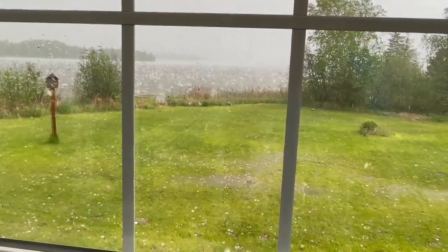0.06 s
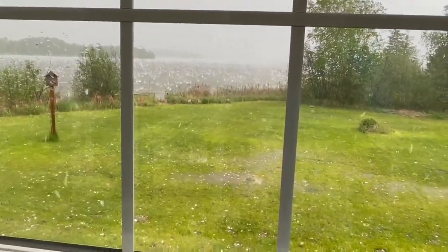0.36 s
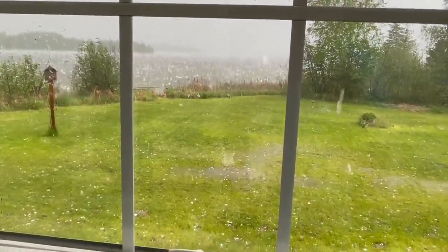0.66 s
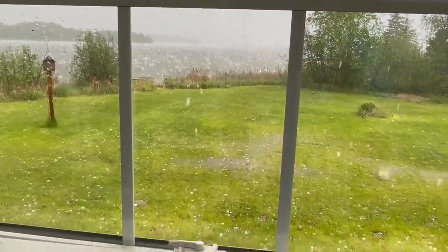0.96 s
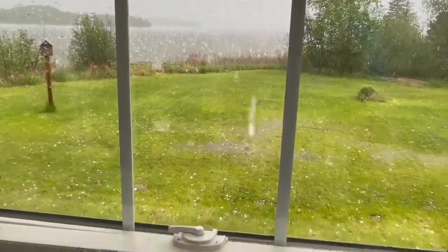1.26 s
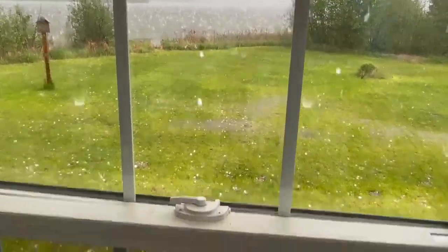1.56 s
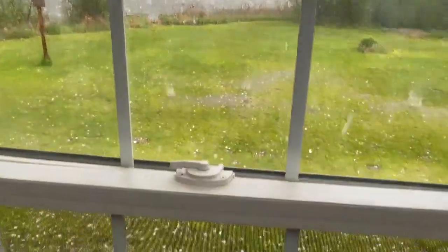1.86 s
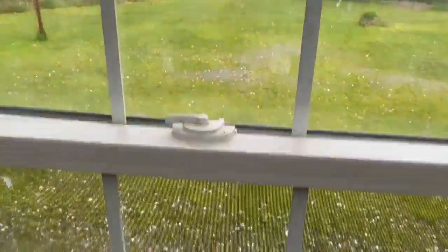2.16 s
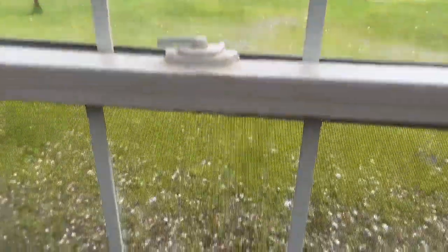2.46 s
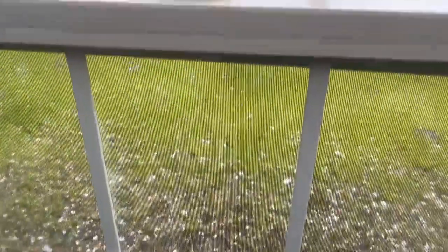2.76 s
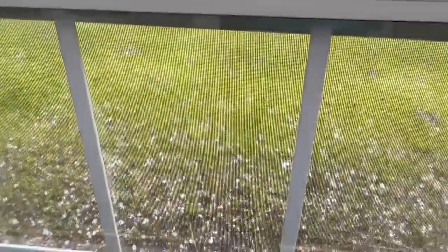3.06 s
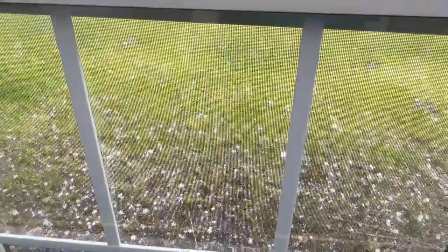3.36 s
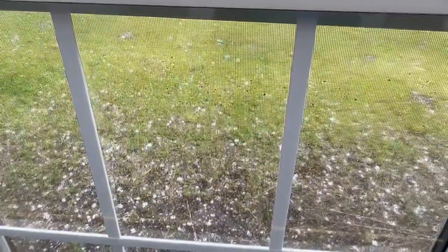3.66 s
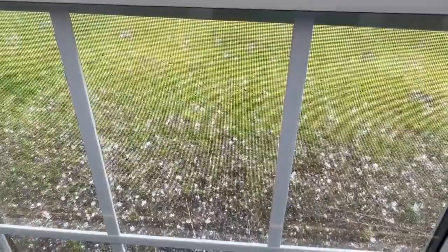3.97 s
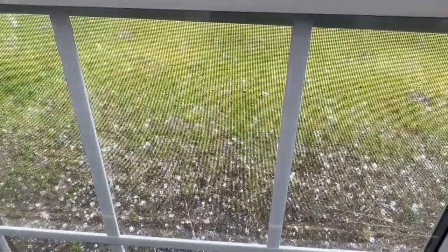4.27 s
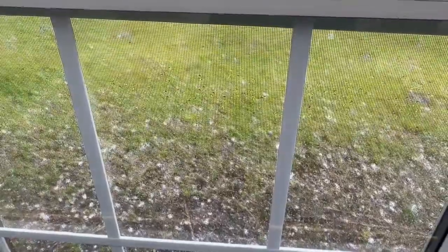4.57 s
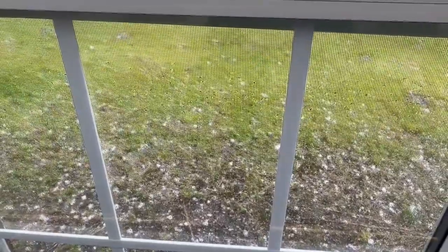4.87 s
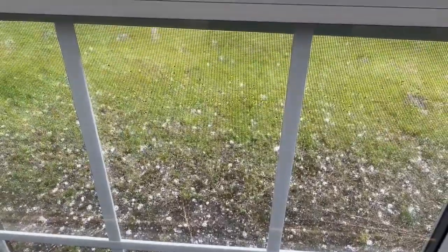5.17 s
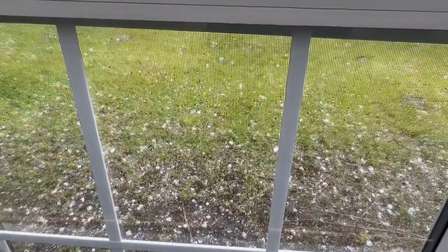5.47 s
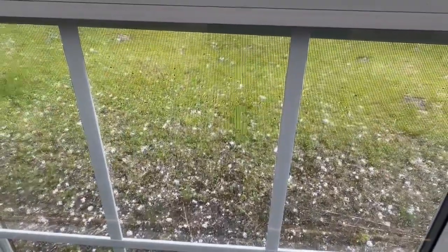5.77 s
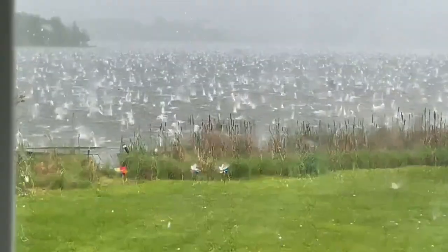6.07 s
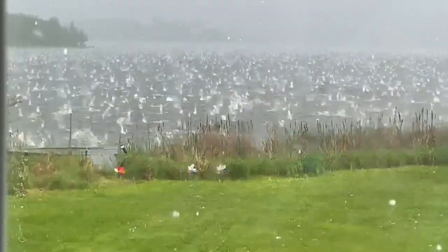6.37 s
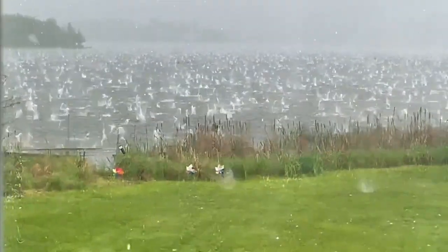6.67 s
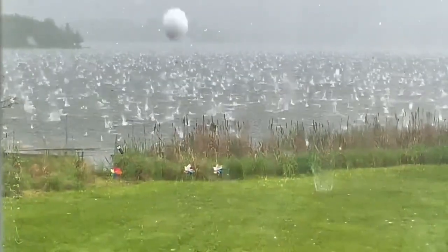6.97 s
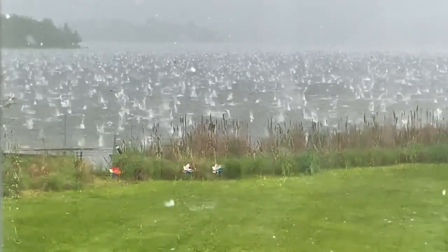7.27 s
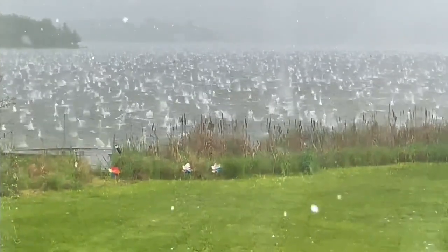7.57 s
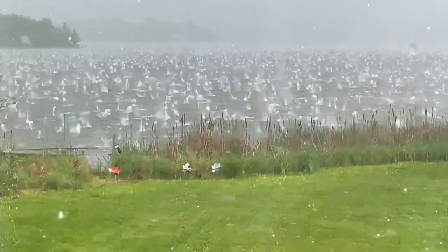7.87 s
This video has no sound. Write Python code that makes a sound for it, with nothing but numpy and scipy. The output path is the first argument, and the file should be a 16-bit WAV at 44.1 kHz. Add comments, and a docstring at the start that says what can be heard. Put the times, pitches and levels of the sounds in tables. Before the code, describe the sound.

A hailstorm is heard from inside a house, close to a shut window. Large stones bang on the roof and walls at uneven intervals, each a hollow knock with a sharp icy crack that dies quickly in the room. Pellets tick on the screen and pane over a wash of hail on lawn and lake. The blows grow heavier midway, the sound cuts out for an instant, then a loud flurry follows.

```python
"""Inside a lakeside house, at a closed window, in a hailstorm.
Big stones bang on roof and walls; the struck part rings and each blow dies away in the room.
The ice cracks and chips as it lands, and pellets tick on screen and pane. Small stones patter
in between, over the wash of hail on lawn and water. Near six seconds the sound drops out
briefly and comes back narrower in the treble."""
import sys
import numpy as np
from scipy import signal
from scipy.fft import rfft, irfft, next_fast_len
from scipy.io import wavfile
from scipy.ndimage import uniform_filter1d

SR = 44100
rng = np.random.default_rng(int(sys.argv[2]) if len(sys.argv) > 2 else 0)


def transcribe(u):
    """Save the signal u as a 16-bit wav file named by the first command-line argument.

    u: samples, shape (n,) or (channels, n), limited to [-1, 1]; the rate is SR.
    q: integer samples, one column per channel.
    """
    v = np.clip(np.atleast_2d(u).T, -1, 1)
    q = np.round(v * 32767).astype(np.int16)
    wavfile.write(sys.argv[1], SR, q)


N = 348831
TIME_S = np.arange(N) / SR
AGE_S = np.arange(SR * 3 // 5) / SR   # time since a hit
FFT_SIZE = 2 * next_fast_len(N // 2 + SR // 4)
BIN_HZ = np.maximum(np.arange(FFT_SIZE // 2 + 1) * SR / FFT_SIZE, 1)
GAP_START_S, GAP_END_S = 5.978, 6.038

# Big stones. Each row: start in seconds, strength in dB, hardness in dB, nearness 0-1,
# boom in dB, thud in dB (both re the blow's weight), part hit.
STONES = [(0.002, -29, 0.5, 0.77, -4, -3, "beam"), (0.027, -37.5, 6, .8, -14, -14, "gutter"),
          (0.155, -44.5, 9.5, 0.4, -8, -8, "gutter"), (0.427, -30.5, -2, 0.55, 0, -1, "post"),
          (0.463, -25, 2.5, 0.62, -18, -9, "wall"), (0.598, -39, 5, 0.55, -10, -2, "frame"),
          (0.697, -13, 2, 0.74, -3.5, -5, "beam"), (1.033, -39, 5.5, 0.3, -5, -6, "frame"),
          (1.23, -32, -6, 0.47, -1, -7, "eave"), (1.424, -40, 10, 0.4, -17, -16, "siding"),
          (1.588, -23, -1.5, 0.58, -7.5, -7, "gable"), (1.926, -42, 6, 0.76, -10, -1, "frame"),
          (2.166, -31.5, 4, 0.5, -5, -11, "frame"), (2.297, -29, 1.5, 0.5, -1.5, -2.5, "gable"),
          (2.397, -25.5, -3, 0.52, -5.5, -8, "board"), (2.577, -38, 8, 0.74, -14, -14, "sill"),
          (2.586, -31.5, 1, 0.4, -19, -5, "soffit"), (2.778, -39.5, -9, 0.6, -10, 0, "siding"),
          (3.065, -38, 1, 0.8, -12, -12, "siding"), (2.866, -26, -4.5, 0.64, -4, -7, "soffit"),
          (3.141, -16, -2, 0.78, -6, -7, "beam"), (3.268, -24.5, 5.5, 0.67, 1, -9, "rafter"),
          (3.5, -30.5, 6.5, 0.71, -12, -21, "frame"), (3.793, -22.5, -3, 0.62, 2.5, 4.5, "eave"),
          (3.804, -20, -1, 0.45, -6.5, 0.5, "board"), (4.027, -30, 3.5, 0.46, -2, 1, "frame"),
          (4.203, -19, 5, 0.5, 3.5, -3, "rafter"), (4.235, -18.5, -3, 0.44, -3, -4, "wall"),
          (4.411, -34.5, 2, 0.9, -5, -16, "gutter"), (4.496, -12, 0, 0.8, -1, -4.5, "roof"),
          (4.607, -21.5, 2, 0.66, -4, -3.5, "trim"), (5.009, -20, 2.5, 0.35, -5, -5.5, "rafter"),
          (5.157, -28.5, 5, 0.27, -10, -4.5, "siding"), (5.288, -34, 5, 0.52, -6, -1.5, "siding"),
          (5.387, -39, 4.5, 0.77, -17, -19, "sill"), (5.505, -32, 7.5, 0.4, -26, -12, "gutter"),
          (5.662, -40, 6.5, 0.74, -13, -15, "gutter"), (5.761, -42, 12, 0.35, -14, -15, "gutter"),
          (5.946, -23.5, 5, 0.5, 0, 1, "rafter"), (6.046, -19.5, 2, 0.44, -0.5, 0.5, "frame"),
          (6.145, -33.5, 8, .6, -10, -14, "sill"), (6.197, -20, -0.5, 0.4, -32, -6.5, "gable"),
          (6.376, -23.5, -5, 0.81, -13, -12.5, "shutter"), (6.505, -19.5, 2, 0.49, -3, 2, "wall"),
          (6.561, -15, 0.5, 0.76, -1.5, -2, "wall"), (6.786, -34.5, 4, 0.13, -16, -17, "siding"),
          (6.886, -31.5, -1, 0.5, -11, -11, "siding"), (6.959, -30.5, 2.5, 0.43, -6, -5.5, "rafter"),
          (7.248, -33, 2, 0.35, -14, -17, "siding"), (7.318, -16.5, 2, 0.41, 2, -2.5, "gable"),
          (7.388, -17, -5, 0.55, -17, -8, "roof"), (7.406, -16, 1.5, 0.45, -11, -9, "roof"),
          (7.44, -19, -5.5, 0, -6.5, -3, "board"), (7.668, -13.5, -1.5, 0.48, -7, -7, "board"),
          (7.717, -15.5, -1, 0.37, -10, -4, "roof")]
# Boom, thud, knock, crack and tick of a blow. Each row: low edge in Hz, high edge in Hz,
# delay in seconds, trim in dB, contact in dB, panel T60 in seconds, room T60 in seconds.
REGISTERS = [(45, 140, .003, -1.5, -5, 0.12, 0.4), (132, 287, .001, 0.5, -5, 0.082, 0.31),
             (286, 1204, -.0005, -2, 14, 0.046, .34), (1245, 3740, -.001, 0, 14, 0.099, 0.33),
             (4100, 13800, -.0015, 2.5, 6, 0.074, 0.26)]
# Spectrum of a blow. Each row: frequency in Hz, relative level in dB.
BLOW_COLOUR = [(30, -8), (55, -3.5), (90, -2.5), (200, -1), (500, -3.5), (700, 0), (1000, -7.5),
               (1350, -10), (2100, -8.5), (3200, -15.5), (4500, -22), (6300, -26), (9500, -36.5),
               (14000, -44)]


def big_stones(forerun_s=0.006, forerun_db=-18):
    """Each stone drives five noise bands; the timber carries a little of the blow ahead of the air."""
    out = np.zeros((2, N))
    for k, (low_hz, high_hz, delay_s, trim_db, contact_db, panel_t60_s, room_t60_s) in enumerate(
            REGISTERS):
        blows = np.zeros((2, N))
        for start_s, strength_db, hardness_db, near, boom_db, thud_db, _ in STONES:
            level_db = register_levels_db(strength_db, hardness_db, boom_db, thud_db)[k] + trim_db
            fade = hit_envelope(near, contact_db, panel_t60_s, room_t60_s)
            blow = from_db(level_db) * fade * echoes(lumpy_db=1.0, hollow=0.21)
            add(blows, start_s + delay_s, blow)
            add(blows, start_s + delay_s - forerun_s, from_db(forerun_db) * blow)
        out += shaped(blows, house_gain(BLOW_COLOUR) * band(low_hz, high_hz))
    return out


def register_levels_db(strength_db, hardness_db, boom_db, thud_db, usual_db=-22):
    """Boom, thud, knock, crack, tick: the spot hit sets the bottom, the ice's hardness the top."""
    extra_db = strength_db - usual_db
    weight_db = usual_db - 3.5 + 0.92 * extra_db
    crack_db = strength_db - 5 + hardness_db
    tick_db = usual_db - 18 + 1.25 * extra_db + hardness_db
    return weight_db + boom_db, weight_db + thud_db, strength_db, crack_db, tick_db


def hit_envelope(near, contact_db, panel_t60_s, room_t60_s):
    """The contact snaps, the panel shakes, the room dies away; unit power over the first 30 ms."""
    contact = from_db(contact_db) * near ** 3 * (1 - np.exp(-AGE_S / 0.00032)) * np.exp(-AGE_S / 0.0013)
    rise_s = 0.0014 + 0.0014 * (1 - near) ** 2   # far blows build up more slowly
    panel = from_db(20.1 * near - 9.5) * rise_and_decay(rise_s, panel_t60_s)
    room = rise_and_decay(0.011, room_t60_s)
    shape = np.sqrt(contact ** 2 + panel ** 2 + room ** 2)
    return shape / np.sqrt(np.mean(shape[AGE_S < 0.03] ** 2))


def echoes(lumpy_db, hollow):
    """Dense mid and side reflections in clumps, combed by waves returning from the panel's edges."""
    knots_s = AGE_S[::96]
    clumps = from_db(lumpy_db * np.interp(AGE_S, knots_s, rng.standard_normal(len(knots_s))))
    dense = rng.standard_normal((2, len(AGE_S)))
    lags = (rng.uniform(0.003, 0.009, 2) * SR).astype(int)
    returns = np.roll(dense, lags[0], axis=1) - np.roll(dense, lags[1], axis=1)
    return rms_one(clumps * (dense + hollow * returns))


# Resonances of roof and room. Each row: centre in Hz, width in Hz, lift in dB.
HOUSE_MODES = [(92.8, 16, 4), (299, 44, 2), (412, 35, 2), (662, 13, 2.5), (752, 40, 3.5), (940, 174, 3.5),
               (2540, 530, 2)]


def house_gain(colour):
    """A broad spectrum with the resonances of the house on top."""
    lift_db = sum(db * np.exp(-np.log(2) * (2 * (BIN_HZ - hz) / width_hz) ** 2)
                  for hz, width_hz, db in HOUSE_MODES)
    return from_db(over_hz(colour) + lift_db)


# Main modes, by part of the house. Each row: frequency in Hz, level in dB re the stone's strength.
PART_MODES = {"beam": [(168, -5), (295, -5), (715, -10.5), (900, -7.5)], "post": [(155, 3), (335, 0.5)],
              "eave": [(203, -4), (415, -7.5), (765, -10)], "wall": [(305, -4), (760, -9)],
              "gable": [(370, -6.5), (680, -12)], "board": [(480, -7), (735, -9)], "rafter": [(689, -4.5),
              (315, -10.5)], "roof": [(666, -6), (421.3, -8.5), (931, -11)], "soffit": [(205, -5),
              (680, -4)], "shutter": [(455, 0), (740, -2.5)], "trim": [(690, -7), (2620, -8.5)],
              "siding": [(930, -1.5), (1900, -10)], "frame": [(1875, -17), (648, -13)], "sill": [(2230, 1)],
              "gutter": [(2640, -3), (2210, -4)]}


def hollow_knocks(detune=0.02, rise_cycles=0.73, side_db=-1.5):
    """The struck part rings at its modes, tuned a little differently at each spot."""
    out = np.zeros((2, N))
    for start_s, strength_db, _, near, _, _, part in STONES:
        lasting = 1 - 0.5 * near ** 3   # small parts round the window stop sooner
        fade = hit_envelope(near, contact_db=-6, panel_t60_s=0.09 * lasting, room_t60_s=0.22 * lasting)
        for mode_hz, ring_db in PART_MODES[part]:
            hz = mode_hz * (1 + detune * rng.uniform(-1.01, 1))
            swing = 1 - np.exp(-AGE_S * hz / rise_cycles)
            add(out, start_s, from_db(strength_db + ring_db) * swing * fade * ring(hz))
    return out * from_db([[0], [side_db]])


def ring(hz, spread=0.0514, count=3):
    """Close panel modes set off together and drift apart; unit power over the first 30 ms."""
    modes_hz = hz * (1 + spread * (np.linspace(-1, 1, count) + rng.uniform(-0.28, 0.27, count)))
    phases = rng.uniform(0, 2 * np.pi, (2, 1, 1)) + 0.59 * rng.standard_normal((2, count, 1))
    weights = np.hanning(count + 2)[1:-1, None]
    wave = (weights * np.sin(2 * np.pi * modes_hz[:, None] * AGE_S + phases)).sum(axis=1)
    return wave / np.sqrt(np.mean(wave[:, AGE_S < 0.03] ** 2, axis=1, keepdims=True))


def cracks(lift_db, apart_s, loss_db, count=5):
    """A near stone splits: one sharp snap, then weaker ones as its pieces strike."""
    snaps = np.zeros((2, N))
    for start_s, strength_db, hardness_db, near, *_ in STONES:
        waits_s = apart_s * rng.uniform(0.5, 2, count)
        sizes = near ** 2 * from_db(strength_db + hardness_db + lift_db - loss_db * np.arange(count))
        at = np.clip((start_s + np.cumsum(waits_s) - waits_s[0]) * SR, 0, N - 1).astype(int)
        snaps[:, at] += sizes * rng.choice([-1, 1], (2, count))
    return shaped(snaps, from_db(over_hz(BLOW_COLOUR)) * band(3000, 13000))


def ice_chips(re_tick_db, t60_s):
    """Hard stones chip as they land: a short bright spray on top of the tick."""
    chips = np.zeros((2, N))
    for start_s, strength_db, hardness_db, near, boom_db, thud_db, _ in STONES:
        tick_db = register_levels_db(strength_db, hardness_db, boom_db, thud_db)[-1]
        spray = rise_and_decay(0.0014, t60_s) * echoes(lumpy_db=-1.0, hollow=0.44)
        add(chips, start_s - 0.001, near * from_db(tick_db + re_tick_db) * spray)
    return shaped(chips, band(5500, 12000))


# Lone pellets or chips on the pane. Each row: start in seconds, level in dB.
PANE_HITS = [(0.464, -40), (0.696, -42), (1.429, -50.5), (2.164, -48), (2.296, -40), (2.419, -49),
             (3.141, -35.5), (3.266, -44), (3.327, -52), (4.202, -36), (4.498, -35.5), (5.106, -45),
             (5.505, -49.5), (5.767, -48.5), (6.504, -50), (6.845, -45), (7.007, -50)]


def pellets(per_s, spread_db, re_storm_db):
    """Stray pellets tick on the window screen, a few louder ones on the pane: dry and bright."""
    hits = random_hits(per_s, spread_db)
    fade = hit_envelope(near=0.81, contact_db=15.5, panel_t60_s=0.031, room_t60_s=0.19)
    tick = fade * echoes(lumpy_db=5.5, hollow=0.22)
    screen = rms_one(signal.oaconvolve(hits, tick, axes=1)[:, :N])
    ticks = screen * storm_gain() * from_db(re_storm_db)
    for start_s, level_db in PANE_HITS:
        add(ticks, start_s, from_db(level_db) * tick)
    return shaped(ticks, band(4300, 9800))


def small_stones(per_s, spread_db, spots=12):
    """Light hits on many spots, from dull taps on the roof to icy clinks near the pane."""
    out = np.zeros((2, N))
    fade = hit_envelope(near=0.66, contact_db=10.5, panel_t60_s=0.029, room_t60_s=0.18)
    for spot_hz in np.geomspace(200, 7000, spots):
        hits = random_hits(per_s / spots, spread_db)
        tap = fade * echoes(lumpy_db=1.5, hollow=0.25)
        resonance = signal.lfilter(*signal.iirpeak(spot_hz, Q=3.0, fs=SR), tap)
        out += signal.oaconvolve(hits, tap + from_db(5.5) * resonance, axes=1)[:, :N]
    return rms_one(out)


# Spectrum of the wash. Each row: frequency in Hz, relative level in dB.
WASH_COLOUR = [(30, -18.5), (55, 3), (90, -1), (200, -1.5), (500, -4), (700, -0.5), (1000, -9.5),
               (1350, -12), (2100, -8.5), (3200, -16), (4500, -21.5), (6300, -23.5), (9500, -32.5),
               (14000, -38)]


def downpour():
    """Countless far hits merge into a wash, with the near patter standing out of it."""
    patter = from_db(-3.5) * small_stones(per_s=60, spread_db=4.5)
    grains = patter + from_db(-5.5) * rng.standard_normal((2, N))
    colour = house_gain(WASH_COLOUR)
    low = from_db(-1) * shaped(grains, colour * band(22, 1520))
    high = from_db(-6) * shaped(grains, colour * band(1220, 16000))
    return storm_gain() * low + storm_gain(swing=0.84) * high


# Strength of the storm. Each row: time in seconds, level in dB.
STORM = [(0.0, -31.5), (0.44, -38.5), (0.68, -32.5), (1.21, -37.5), (2.16, -37), (2.9, -35.5),
         (3.34, -29.5), (3.56, -35), (4.9, -36.5), (5.13, -38), (6.0, -34.5), (6.8, -31), (7.22, -33),
         (7.44, -25.5), (7.9, -32)]


def storm_gain(swing=1):
    """The storm swells and eases; swing scales its dB excursions about the mean."""
    db = np.interp(TIME_S, *np.transpose(STORM))
    return from_db(db.mean() + swing * (db - db.mean()))


# Response of a microphone pair that faces another way after the gap. Each row: frequency in Hz, then
# side re mid in dB, left re right in dB, left lead in radians before the gap, then those three after.
STEREO_RESPONSE = [(100, -21, 1, 0, -22, 0.5, 0), (396, -10, 0, 0.27, -11, 0.5, 0),
                   (730, -7, 3, 0.97, -8, 3.5, 0.65), (1110, -2, 2.5, 0.8, -5, -0.5, 0),
                   (1500, -2.5, 1.5, -0.5, -3, 5, -0.7), (2080, 0.5, -2.5, -0.55, -7, 4.5, 0.05),
                   (2730, -3.5, -1, 0.5, -21, 0, 0.7), (3520, -3, 1, 0.5, -27, 0, -0.1),
                   (4700, -3.5, 5, 0.67, -39, -0.5, 0), (6100, -2.5, 0.5, 0, -18, 0, 0.8),
                   (7240, -15, -2, -2, -16, -1.5, -1.84), (8880, -38, 5.5, -4, -32, 5.5, -4),
                   (10700, -16, -2, -5.5, -18, -1.5, -5.5), (13900, -15, 0, -9, -10, 1, -9)]


def microphones(mid_side):
    """Mid/side to left/right: long waves arrive alike, near 8 kHz opposed; the treble narrows later."""
    mid, side = rfft(mid_side, FFT_SIZE)
    hz, *columns = np.transpose(STEREO_RESPONSE)
    curves = [over_hz(np.column_stack([hz, column])) for column in columns]
    before_after = []
    for width_db, lean_db, lead_rad in (curves[:3], curves[3:]):
        width = from_db(width_db)
        turn = from_db(lean_db / 2) * np.exp(0.5j * lead_rad)
        left_right = np.array([(mid + width * side) * turn, (mid - width * side) / turn])
        before_after.append(irfft(left_right / np.hypot(1, width))[:, :N])
    return np.where(TIME_S < GAP_END_S, *before_after)


def random_hits(per_s, spread_db):
    """One row of impulses at random times and levels."""
    return (rng.random((1, N)) < per_s / SR) * from_db(spread_db * rng.random(N))


def rise_and_decay(rise_s, t60_s):
    """Exponential attack and decay."""
    return (1 - np.exp(-AGE_S / rise_s)) * from_db(-60 * AGE_S / t60_s)


def from_db(db):
    """Decibels to gain."""
    return 10 ** (np.asarray(db) / 20)


def rms_one(x):
    """Scale to unit power."""
    return x / np.sqrt(np.mean(x ** 2) + 1e-20)


def over_hz(points):
    """Interpolate a table over log frequency."""
    hz, value = np.transpose(points)
    return np.interp(np.log(BIN_HZ), np.log(hz), value)


def band(low_hz, high_hz):
    """Gain of a band with soft edges."""
    return 1 / np.sqrt((1 + (low_hz / BIN_HZ) ** 8) * (1 + (BIN_HZ / high_hz) ** 8))


def shaped(x, gain):
    """Minimum-phase filter of the given shape; keeps the power of white noise."""
    cepstrum = irfft(np.log(rms_one(gain) + 1e-5))
    cepstrum[1:FFT_SIZE // 2] *= 2
    cepstrum[FFT_SIZE // 2 + 1:] = 0
    return irfft(rfft(x, FFT_SIZE) * np.exp(rfft(cepstrum)))[..., :N]


def add(track, start_s, sound):
    """Mix one hit into a track."""
    at = int(np.clip(start_s * SR, 0, N - 1))
    track[:, at:at + len(AGE_S)] += sound[:, :N - at]


def scene():
    """Blows, breaking ice, pellets and downpour, as they arrive at the window."""
    ice = cracks(lift_db=9.5, apart_s=0.0025, loss_db=3.0) + ice_chips(re_tick_db=-1, t60_s=0.13)
    ticks = pellets(per_s=9, spread_db=7.0, re_storm_db=-28.5)
    return microphones(big_stones() + hollow_knocks() + ice + ticks + downpour())


def record(dry):
    """The sound drops out for a moment, peaks are rounded and the top is cut."""
    outside_gap = (TIME_S < GAP_START_S) | (TIME_S > GAP_END_S)
    gate = uniform_filter1d(outside_gap.astype(float), size=64)
    rounded = 1.128 * np.tanh(dry * gate / 1.1)
    lowpass = signal.ellip(10, 0.2, 80, 14100, fs=SR, output="sos")
    return signal.sosfilt(lowpass, rounded)


dry = scene()
out = record(dry)
transcribe(out)
```